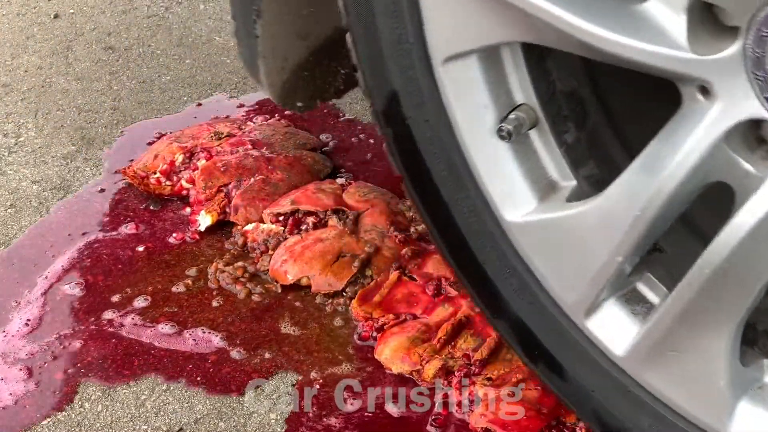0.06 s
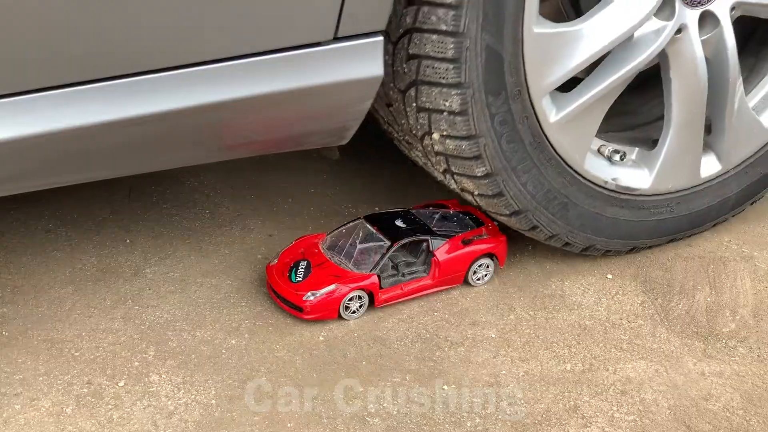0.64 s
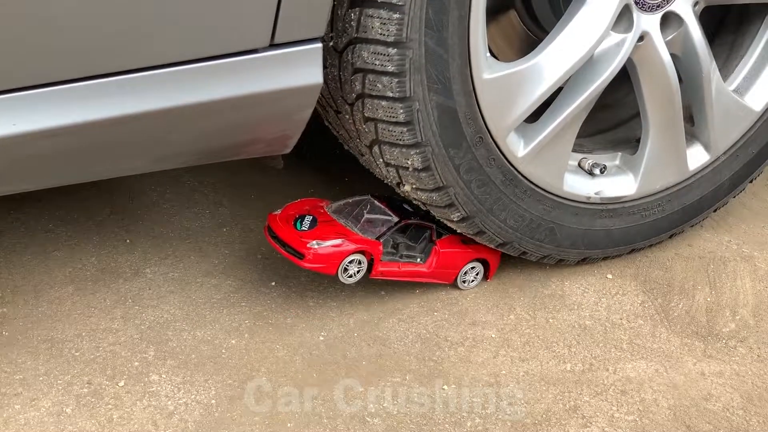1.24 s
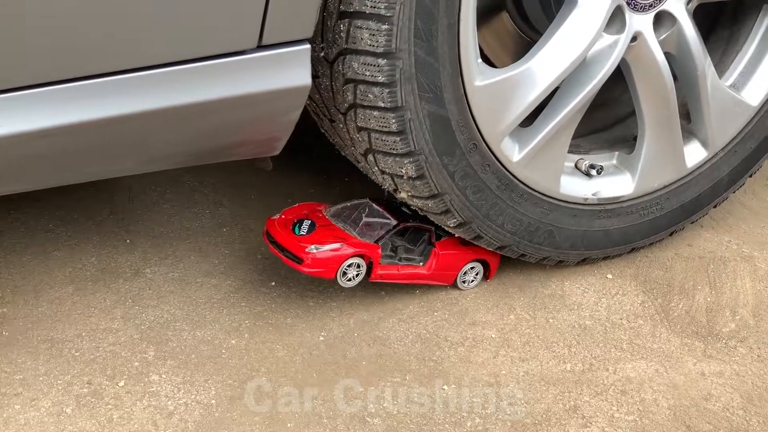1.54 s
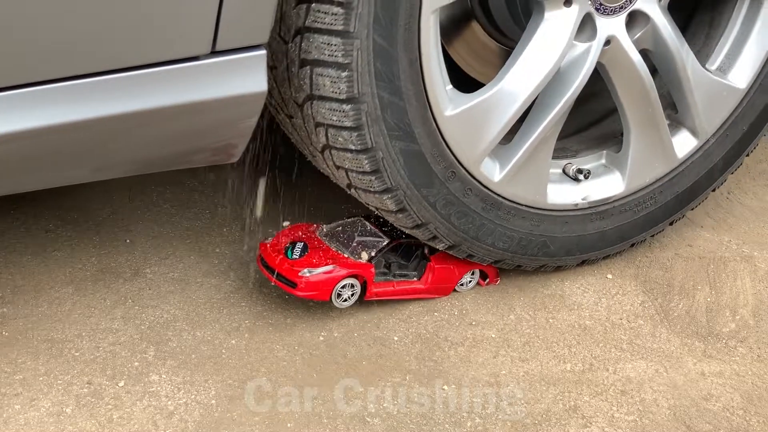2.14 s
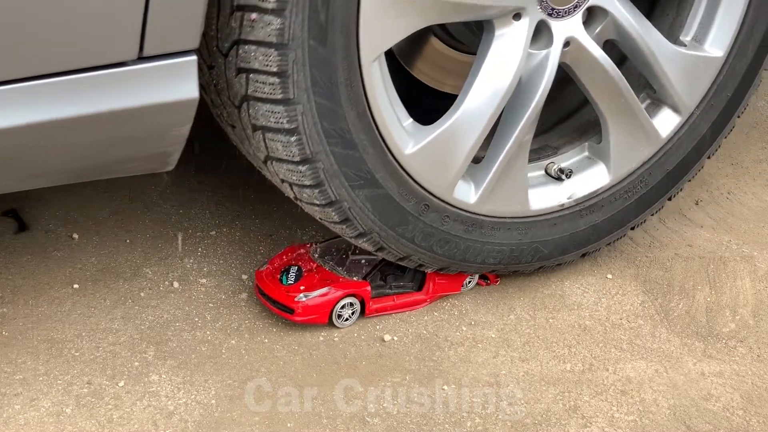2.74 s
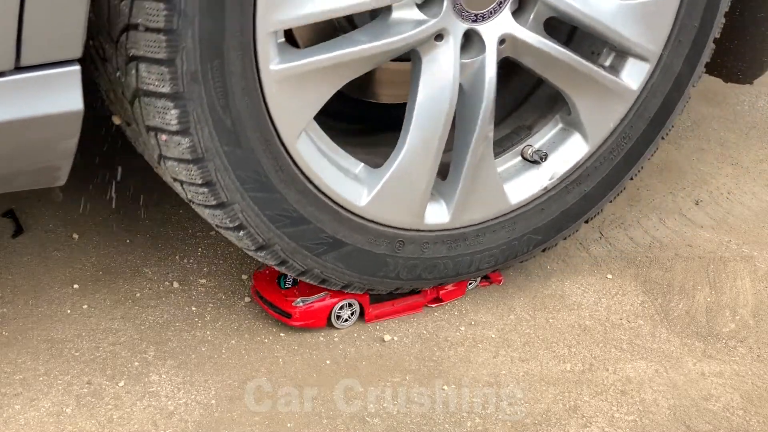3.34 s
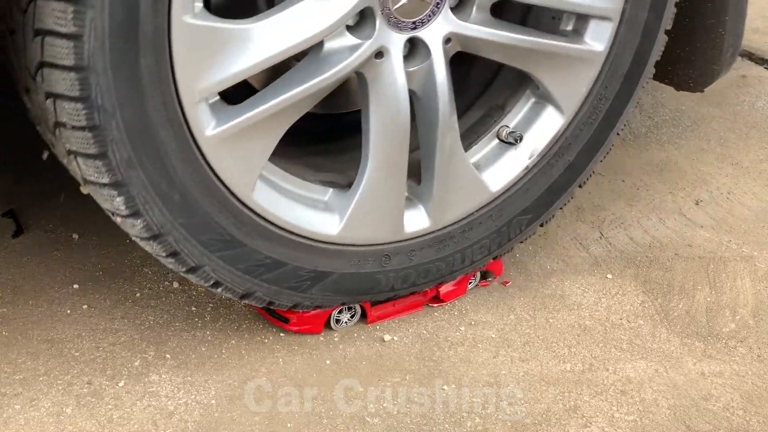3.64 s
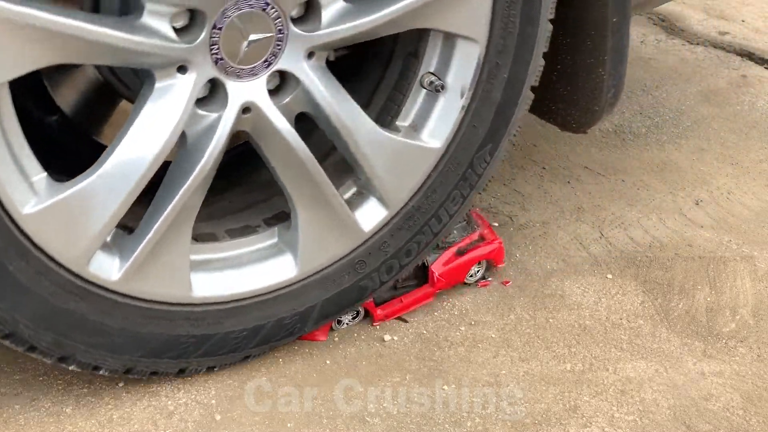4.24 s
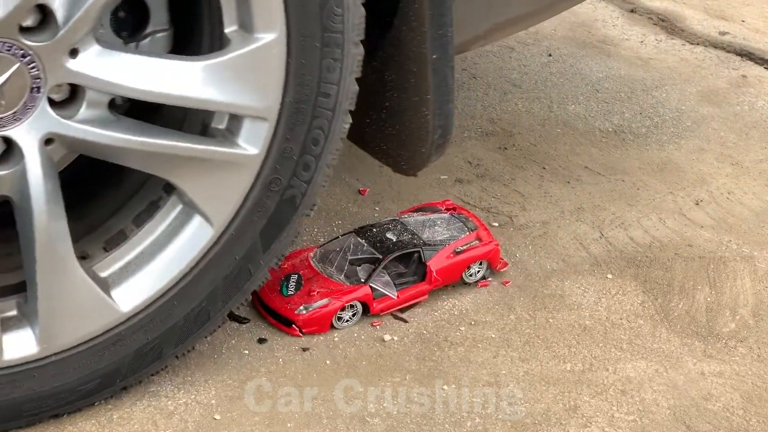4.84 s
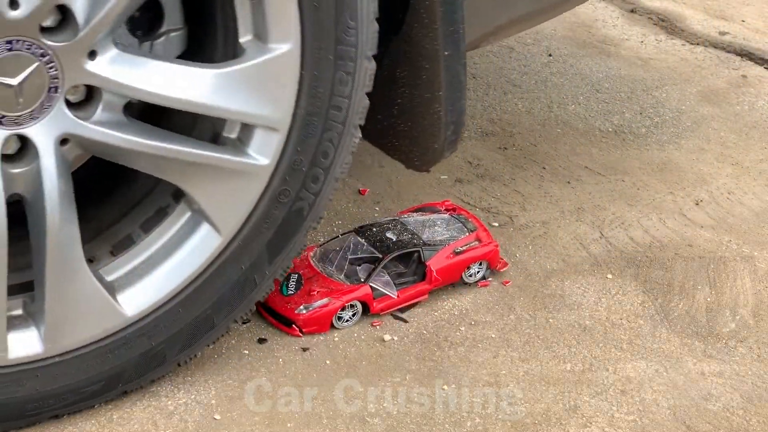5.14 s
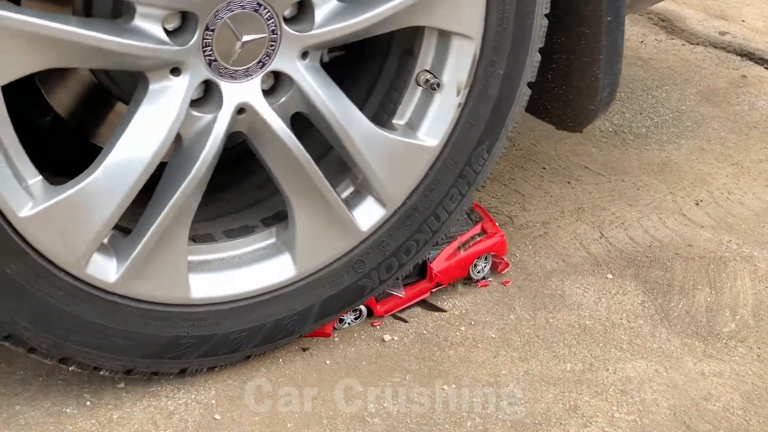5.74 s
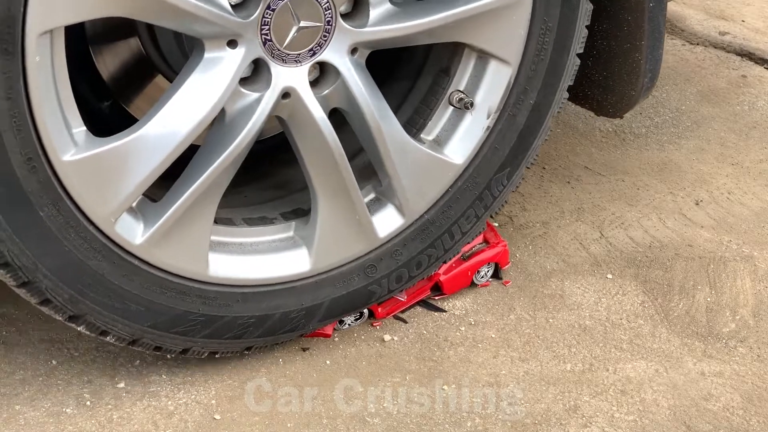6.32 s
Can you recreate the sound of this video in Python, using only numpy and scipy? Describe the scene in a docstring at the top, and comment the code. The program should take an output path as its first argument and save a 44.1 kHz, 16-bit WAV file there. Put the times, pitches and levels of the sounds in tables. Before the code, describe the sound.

Sharp, brittle cracks sound close up as a car wheel slowly flattens a plastic toy on concrete. A small scrape and a first snap lead into dense splintering, with fine ticks of grit and low bumps from the tyre. The cracking stops for about a second, then returns in a shorter, sparser run. Farther off, a low engine hum continues throughout, raspy at the start and dipping after loud cracks.

```python
"""A four-cylinder engine ticks over a little way off, with a bright rasp at first, as a car rolls off
squashed fruit. Right by the microphone its tyre creeps over grit onto a plastic toy car on concrete.
The toy scrapes, then its shell breaks in runs of dry snaps, with lesser splits and a scatter of chips;
where it caves in, the tyre drops with a thump. The wheel rolls off, then comes back over the wreck."""
import sys
import numpy as np
from scipy import signal
from scipy.fft import rfft, irfft, next_fast_len
from scipy.io import wavfile
from scipy.ndimage import uniform_filter1d, map_coordinates

SR = 44100
rng = np.random.default_rng(int(sys.argv[2]) if len(sys.argv) > 2 else 0)


def wav_out(sig):
    """Save sig, one row per channel (or a flat mono array), as 16-bit PCM at SR to the path in sys.argv[1]."""
    wavfile.write(sys.argv[1], SR, np.round(np.clip(np.atleast_2d(sig).T, -1, 1) * 32767).astype(np.int16))


N = 285768
EVENT_SIZE = 4096  # samples in one crack or thump
EVENT_T, EVENT_HZ = np.arange(EVENT_SIZE) / SR, np.fft.rfftfreq(EVENT_SIZE, 1 / SR)

# main fractures of the shell: t/s, snap/dB, ring of the piece/Hz, splinter/dB, knock/dB, nominal tear/s
FRACTURES = [(1.0233, -24, 3740, -39, -54, 0.0045), (1.028, -19, 3540, -17.5, -39, 0.0076),
             (1.49, -26, 6140, -17, -34.5, 0.0014), (1.603, -56, 6000.0, -23, -41, 0.0029),
             (1.6456, -30, 6000.0, -16, -36, 0.0048), (1.6535, -25.5, 2820, -19.5, -47, 0.00092),
             (1.7626, -36, 6200.0, -19, -31.5, 0.00094), (1.774, -26, 2830, -18.5, -47, 0.0015),
             (1.7901, -17.5, 5700.0, -14.5, -34, 0.0028), (1.806, -24, 6670, -14.5, -24, 0.0046),
             (1.837, -29.5, 6800.0, -21, -40, 0.0033), (1.8545, -34, 5660, -21, -45, 0.0018),
             (1.8612, -28, 5660, -16, -35, 0.0042), (1.8645, -18.5, 5780, -17, -22, 0.0033),
             (1.8807, -26, 2130, -24, -43, 0.0015), (1.8835, -21.5, 2140, -22, -34, 0.0012),
             (1.8952, -24, 2130, -24, -41, 0.0035), (1.903, -17.5, 2020, -17.5, -26.5, 0.0013),
             (1.9858, -40.5, 6200.0, -26, -39.0, 0.0023), (2.0365, -46, 3700.0, -32, -60, 0.0027),
             (2.0835, -41.5, 5450, -33, -62, 0.0018), (2.1265, -27, 6000, -16, -51, 0.0047),
             (2.192, -29, 6120, -23.5, -44, 0.0061), (2.253, -32, 5700.0, -24.5, -36, 0.0014),
             (2.279, -17.5, 3650, -19, -23.5, 0.003), (2.2834, -26, 1400, -23, -29, 0.0022),
             (2.321, -35.5, 1000.0, -30, -31, 0.0025), (2.386, -16, 1810, -16, -27.5, 0.00069),
             (2.4135, -18, 2010, -18.5, -26, 0.0032), (2.4346, -19.5, 3820, -25.5, -31.5, 0.0016),
             (2.504, -40, 5760, -29.5, -52, 0.0044), (2.5502, -33.5, 5400, -26.5, -45, 0.0034),
             (2.5765, -20.5, 2600, -16.5, -50, 0.0026), (2.581, -32, 5600, -22, -44, 0.0019),
             (2.593, -24, 4660, -25, -33, 0.0032), (2.661, -18, 1220, -17.5, -22.5, 0.0079),
             (2.679, -30.5, 2400, -29.5, -33.5, 0.003), (2.739, -40, 6300.0, -26, -53, 0.0013),
             (2.772, -37, 2470, -25.5, -50, 0.0038), (2.7963, -19.5, 2000, -19.5, -31.5, 0.0033),
             (2.8005, -23, 1900, -21, -34, 0.0063), (2.807, -30.5, 1900, -29.5, -38.5, 0.0035),
             (2.881, -31.5, 6840, -27, -35.5, 0.0024), (2.9305, -15, 1310, -16.5, -20.5, 0.0062),
             (2.94, -20, 2190, -22, -25.5, 0.0049), (2.9619, -29, 3950, -25, -36, 0.005),
             (3.016, -30.5, 1290, -29, -40, 0.0012), (3.0683, -22.5, 4460, -20.5, -23, 0.0016),
             (3.0934, -27.5, 2810, -18.5, -37, 0.0063), (3.1027, -22, 2920, -18, -29.5, 0.00053),
             (3.1307, -18, 1400.0, -15.5, -21.5, 0.0057), (3.203, -36, 3820, -31, -52, 0.0037),
             (3.2407, -42, 4700.0, -32.5, -51, 0.00077), (3.2969, -30, 3870, -27.5, -40.5, 0.011),
             (3.338, -27.5, 1310, -27, -31, 0.0012), (3.372, -16.5, 1720, -18.5, -22.5, 0.0021),
             (3.382, -26.5, 2490, -25.5, -35.5, 0.0049), (3.433, -37, 6800.0, -28.5, -39, 0.0062),
             (3.4612, -25, 6500.0, -24, -26.5, 0.0023), (3.529, -23, 3480, -18, -34, 0.0045),
             (3.599, -34, 2100.0, -26.5, -35.5, 0.002), (3.6024, -26.5, 2100, -23, -32, 0.0022),
             (3.609, -23, 2150, -23.5, -29, 0.0024), (3.6648, -22.5, 3470, -18.5, -31, 0.0013),
             (3.7129, -23, 2570, -19, -21.5, 0.0046), (3.7375, -27.5, 6500.0, -25.5, -34.5, 0.0061),
             (3.7607, -36, 3800.0, -25.5, -46, 0.0012), (3.7907, -29.5, 2800, -37, -34, 0.0017),
             (3.8085, -22, 2530, -25, -37, 0.0013), (3.932, -31, 3500.0, -27, -35.5, 0.003),
             (3.954, -23.5, 3900.0, -17.5, -25, 0.0013), (3.9867, -29.5, 4200, -29, -49, 0.0036),
             (3.9919, -22, 2630, -22.5, -34.5, 0.0018), (4.042, -34, 2130, -42.5, -58, 0.00054),
             (4.0991, -25.5, 2490, -22.5, -23, 0.0021), (4.1337, -33.5, 2800.0, -30.5, -35, 0.0015),
             (4.162, -32.5, 1000.0, -33, -23.5, 0.0023), (4.1751, -25, 2930, -28.5, -21.5, 0.0037),
             (4.367, -21, 3180, -26.5, -26.5, 0.0014), (4.4487, -35.5, 2280, -45.5, -45, 0.015),
             (4.4804, -36, 3680, -39, -65, 0.0096), (5.4491, -31, 2920, -26, -44, 0.0045),
             (5.5048, -34.5, 6330, -24.5, -43, 0.0047), (5.589, -38, 1520, -22.5, -49, 0.00035),
             (5.5964, -34, 4000, -30, -33, 0.0027), (5.6004, -26, 1500, -34, -23, 0.0016),
             (5.6115, -37, 3950, -22, -33, 0.0019), (5.6842, -24, 3300.0, -23.5, -30, 0.0025),
             (5.6912, -25, 1650, -27, -38, 0.0022), (5.7003, -27.5, 4000.0, -23, -45, 0.0023),
             (5.7458, -19, 2700, -24.5, -25, 0.0014), (5.884, -41.5, 1490, -59, -47, 0.0059),
             (5.9487, -31, 1670, -38, -42, 0.0025), (5.956, -20.5, 1660, -30.5, -40, 0.0039),
             (6.059, -33, 1730, -33, -59, 0.0079), (6.121, -36, 1730, -31.5, -32, 0.0033),
             (6.2052, -39.5, 1520, -44, -33.5, 0.00036), (6.307, -35, 4260, -28, -45, 0.0044),
             (6.3608, -20, 2770, -17, -27.5, 0.0019)]
# spectrum of a dry snap: f/Hz, level/dB
SNAP_SPECTRUM = [(300, -17), (900, -11), (1300, -4.5), (2000, -4), (3800, -5), (5000, -9), (7000, -11.5),
                 (12000, -44.5)]
# spectrum of bright splintering: f/Hz, level/dB
SPLINTER_SPECTRUM = [(1500, -22.5), (4000, -5.5), (5600, -1.5), (7200, -2), (8700, 0.5), (11000, -2),
                     (13200, -2), (15600, -5), (16500, -37.5)]


def amp(db):
    return 10 ** (np.asarray(db) / 20)


def unit(x):
    return x / np.sqrt(np.mean(x ** 2) + 1e-20)


def along(points, hz):
    """(Hz, value) points on a log axis."""
    f, v = np.transpose(points)
    return np.interp(np.log(hz + 1), np.log(f + 1), v)


def curves(rows):
    """One value per sample for each column after the time."""
    s, *cols = np.transpose(rows)
    return [np.interp(np.arange(N) / SR, s, c) for c in cols]


def wobble(rate):
    """A smooth random curve, rate knots a second."""
    return map_coordinates(rng.standard_normal(int(N * rate / SR) + 4), [np.arange(N) * rate / SR])


def filtered(x, response):
    """x times a complex response of frequency."""
    m = next_fast_len(N + SR // 2)
    return irfft(rfft(x, m) * response(np.fft.rfftfreq(m, 1 / SR)), m)[..., :N]


def coloured(x, spectrum):
    """x shaped by a spectrum, at rms 1."""
    return unit(filtered(x, lambda hz: amp(along(spectrum, hz))))


def causal(gain_db):
    """The response with this gain that rings only after its cause."""
    cepstrum = irfft(np.log(amp(gain_db)))
    half = cepstrum.shape[-1] // 2
    cepstrum[..., 1:half] *= 2
    cepstrum[..., half + 1:] = 0
    return np.exp(rfft(cepstrum))


def ports(pair, likeness):
    """Two unrelated signals become left and right with a given likeness."""
    turn = lambda hz: np.arccos(np.clip(along(likeness, hz), -1, 1)) / 2
    mid, side = filtered(pair, lambda hz: np.array([np.cos(turn(hz)), np.sin(turn(hz))]))
    return np.array([mid + side, mid - side])


def ringing(x, modes):
    """x through resonances: f/Hz, width/Hz, level/dB."""
    return filtered(x, lambda f: sum(amp(db) * 1j * f * width / (centre**2 - f**2 + 1j * f * width)
                                     for centre, width, db in modes))


def placed(sounds, times, level_db):
    """Lay one sound per event on a stereo track, at its level over the first 10 ms."""
    sounds = sounds / np.sqrt(np.mean(sounds[..., :SR // 100] ** 2, axis=-1, keepdims=True))
    track = np.zeros((2, N + EVENT_SIZE))
    for s, db, sound in zip(times, level_db, sounds):
        track[:, round(s * SR):][:, :EVENT_SIZE] += amp(db) * sound
    return track[:, :N]


def tears(gain_db, length, jagged_db, echo_db, echo_t60, tail_db, tail_t60, rise=.0003, ragged_db=3):
    """Plastic tears in jerks, then splinters on and echoes under the wheel; times in s."""
    def jerks(db, hold):
        steps = rng.standard_normal((len(length), 1, EVENT_SIZE // hold))
        return np.repeat(amp(db * steps), hold, axis=-1)

    t = EVENT_T
    tear = jerks(jagged_db, hold=16) * np.exp(-(t / length[:, None, None]) ** 2)
    decay = amp(echo_db - 60 * t / echo_t60) + amp(tail_db - 60 * t / tail_t60)
    echoes = jerks(ragged_db, hold=64) * decay
    onset = 1 - np.exp(-(t / rise) ** 2)
    force = onset * (tear + echoes) * rng.standard_normal((len(length), 2, EVENT_SIZE))
    return irfft(rfft(force) * causal(gain_db)[..., None, :])


def engine(waver_db=2.5, throb=.17, rumble_db=-4.5, hiss_db=-11.5, tick_depth=1.35, tick_turns=.22):
    """Idle, a little way off: exhaust note, droning panels, rumble, and hiss that ticks once a turn."""
    # the engine at the microphone, ducked by the phone's gain control after loud cracks: t/s, level/dB
    heard_engine_level = [(0, -36), (.4, -34.5), (.53, -35), (.58, -31), (1.02, -30.5), (1.05, -42.5),
                          (1.17, -40), (1.23, -30.5), (1.6, -33), (1.78, -35), (2.0, -50.5), (2.24, -35.5),
                          (2.35, -44.5), (2.75, -43), (3.2, -44.5), (5.0, -46.5), (5.04, -41), (5.55, -38),
                          (6.48, -38)]
    crank_speed = [(0, 27.7), (.8, 27.5), (1.6, 27.3), (3, 27.4), (4.7, 27.6), (6.48, 27.7)]  # t/s, speed/(turns per s)
    exhaust_orders = [(1, -29), (2, 5.5), (3, -3), (4, -7), (5, -8.5), (6, -20.5), (7, -18), (8, -14.5),
                      (9, -23), (10, -22), (11, -21.5), (12, -14)]  # multiple of the crank speed, relative level/dB
    panel_levels = [(0, -70, -47.5, -70), (.5, -70, -43, -70), (.6, -62, -61.5, -67), (.8, -56, -61, -50.5),
                    (1.3, -55, -61, -52), (1.9, -61, -60.5, -62), (4.2, -60.5, -60.5, -69),
                    (5.1, -51.5, -61, -63.5), (6.48, -50, -68, -59)]  # body panels: t/s, 5th order/dB, 6th order/dB, 12th order/dB
    rumble_spectrum = [(20, -17), (50, 1.5), (100, 1), (200, -2.5), (270, -1.5), (340, -2.5), (400, -2),
                       (470, 1), (600, -4.5), (800, -4), (1150, -12.5), (2500, -27), (8000, -67.5)]  # f/Hz, level/dB
    hiss_spectrum = [(400, 9.5), (1200, -0.5), (1600, 6.5), (2100, 5), (2900, 2), (3600, -2), (5800, -5.5),
                     (7300, -11.5), (9000, -9.5), (11000, -13), (13500, -14.5), (15700, -23), (16300, -45)]  # f/Hz, level/dB
    rasp_level = [(0, -45), (.54, -46), (.6, -73), (.7, -100)]  # bright edge on the ticking, beside the fruit: t/s, level/dB
    rasp_spectrum = [(700, -6), (1700, -2), (2500, 1.5), (2780, 4), (3050, -1.5), (3500, -6), (4800, -7.5),
                     (6700, -10), (8600, -12), (10000, -19), (13500, -23), (16000, -33.5)]  # f/Hz, level/dB
    far_likeness = [(60, 0.61), (250, 0.49), (600, -0.29), (1300, -0.77), (2500, 0.81), (3600, -0.4),
                    (4600, 0.14), (6000, -0.11), (8600, 0.8), (11500, 1)]  # diffuse sound at the two microphone ports: f/Hz, correlation
    heard_db, = curves(heard_engine_level)
    turns = np.cumsum(curves(crank_speed)[0] * (1 + .004 * wobble(9))) / SR
    angle = 2 * np.pi * turns
    note = np.zeros(N)
    for order, db in exhaust_orders:
        unrest = np.log(order / 2)  # zero at the firing rate, twice a turn
        strength = amp(db + waver_db * unrest * wobble(7.6))
        note += strength * np.cos(order * angle + .62 * unrest * wobble(11))
    drone = sum(amp(db) * np.sqrt(2) * np.sin(order * angle)
                for order, db in zip((5, 6, 12), curves(panel_levels)))
    hum = amp(heard_db) * unit(note) + drone
    noise = lambda spectrum: coloured(rng.standard_normal((2, N)), spectrum)
    rumble = amp(heard_db + rumble_db + 1.8 * wobble(12)) * noise(rumble_spectrum)
    rumble *= 1 + throb * np.cos(angle)
    hiss = amp(heard_db + hiss_db) * noise(hiss_spectrum)
    rasp = amp(curves(rasp_level)[0]) * noise(rasp_spectrum)
    ticking = unit(1 + tick_depth * np.exp(-(turns % 1) / tick_turns))
    return hum * amp([[-1.2], [1.1]]) + ports(rumble + (hiss + rasp) * ticking, far_likeness)


def grit_and_chips(ticks_per_s=1000, tick_t60=.004, chip_db=-20.5, chip_t60=.16):
    """Tiny uneven ticks: dull grit under the tread, and bright chips scattering after each fracture."""
    grit_level = [(0, -52.5), (.95, -56.5), (1.1, -48.5), (1.5, -45.5), (2.05, -54.5), (3.7, -49),
                  (4.25, -55), (4.46, -42.5), (4.53, -77), (5.35, -71.5), (5.6, -39.5), (5.9, -61.5),
                  (6.48, -48)]  # t/s, level/dB
    ticks = (rng.random(N) < ticks_per_s / SR) * amp(3.7 * np.minimum(rng.exponential(size=N), 3))
    t = np.arange(SR // 20) / SR
    grains = signal.fftconvolve(ticks, amp(-60 * t / tick_t60))[:N] * rng.standard_normal((2, N))
    dull, bright = coloured(grains, SNAP_SPECTRUM), coloured(grains, SPLINTER_SPECTRUM)
    grit = amp(curves(grit_level)[0]) * unit(dull + amp(-6) * bright)
    s, snap_db = np.transpose(FRACTURES)[:2]
    shed = np.bincount(np.round(s * SR).astype(int), amp(snap_db + chip_db) ** 2, N)
    chip_power = signal.lfilter([1], [1, -amp(-60 / (chip_t60 * SR)) ** 2], shed)
    return grit + np.sqrt(chip_power) * unit(dull + amp(2) * bright)


def scrape(rough_db=3):
    """As the tyre first bears on it, the toy slips unevenly on the concrete and its shell rings."""
    scrape_level = [(.84, -92.5), (.9, -48), (.94, -48), (.97, -61), (1.02, -38), (1.05, -87)]  # t/s, level/dB
    shell_modes = [(4200, 220, 0), (6210, 250, -5.5)]  # f/Hz, width/Hz, level/dB
    slips = amp(rough_db * wobble(150)) * rng.standard_normal((2, N))
    return amp(curves(scrape_level)[0]) * unit(ringing(slips, shell_modes))


def hairline_cracks(snap_db=-8, tear_s=.0009):
    """The strained shell clicks between fractures: short, bright and dry."""
    clicks = [(1.0006, -39), (1.078, -49), (1.1045, -41), (1.118, -40.5), (1.167, -39), (1.2, -45),
              (1.371, -41.5), (1.405, -39.5), (1.468, -35), (1.729, -37.5), (1.822, -28), (1.978, -41),
              (2.247, -29.5), (2.312, -42), (2.356, -34), (2.459, -49), (2.189, -32), (2.641, -40),
              (2.723, -33.5), (2.918, -32.5), (2.975, -33), (3.000, -29.5), (3.039, -36.5), (3.060, -39),
              (3.126, -30), (3.222, -41), (3.332, -31), (3.365, -30), (3.394, -33), (3.455, -42),
              (3.506, -35.5), (3.562, -44), (3.578, -35.5), (3.644, -31), (3.676, -30.5), (3.726, -31.5),
              (3.836, -38), (3.870, -39), (3.895, -35), (3.900, -34.5), (3.946, -33.5), (4.033, -35.5),
              (4.083, -44), (4.148, -38), (4.262, -45), (4.414, -51), (5.438, -37.5), (5.576, -36.5),
              (5.654, -39.5), (6.042, -37.5), (6.436, -40)]  # t/s, splinter level/dB
    s, db = np.transpose(clicks)
    length = np.full(len(s), tear_s)
    texture = dict(jagged_db=4, echo_db=-17, echo_t60=.04, tail_db=-26, tail_t60=.09)
    splinter = tears(along(SPLINTER_SPECTRUM, EVENT_HZ), length, **texture)
    snap = tears(along(SNAP_SPECTRUM, EVENT_HZ), length, **texture)
    return placed(splinter, s, db) + placed(snap, s, db + snap_db)


def buckles(width_octaves=.17):
    """A flattened panel of the toy gives way softly and knocks in one hollow resonance."""
    knocks = [(2.799, -28, 1950, .004), (3.954, -29.5, 1320, 0.0036), (4.16, -30, 1210, .003),
              (5.451, -31.5, 1070, 0.0041), (5.452, -30, 1620, 0.0043), (5.597, -24, 1547, .005),
              (5.956, -30.5, 1160, 0.0045), (6.118, -29, 1143, 0.0054)]  # t/s, level/dB, ring/Hz, tear/s
    s, db, ring_hz, length = np.transpose(knocks)
    ring_db = -14 * np.log10(1 + (np.log2((EVENT_HZ + 1) / ring_hz[:, None]) / width_octaves) ** 2)
    hollow = tears(ring_db, length, rise=.001, jagged_db=3, ragged_db=2,
                   echo_db=-13, echo_t60=.04, tail_db=-22, tail_t60=.1)
    return placed(hollow, s, db)


def tyre_thumps(nudge_db=-16.5, push_s=.00052):
    """Each main fracture nudges the tyre, each cave-in drops it; its sidewall and the air inside ring."""
    drops = [(1.868, -33), (1.905, -25.5), (2.2815, -26.5), (2.4155, -36), (2.6635, -23.5), (3.134, -19),
             (3.3745, -26.5), (3.956, -27), (3.995, -35), (4.177, -31.5), (4.369, -34.5), (5.748, -29)]  # t/s, level/dB
    thump_spectrum = [(30, -38.5), (90, -8.5), (150, -9.5), (300, 1), (420, 1.5), (800, -14), (2000, -47)]  # f/Hz, level/dB
    tyre_modes = [(138, 26, 2), (226, 26, -2), (217, 5, 1)]  # f/Hz, width/Hz, level/dB
    nudges = [(s, knock_db + nudge_db) for s, *_, knock_db, _ in FRACTURES]
    s, db = np.vstack([drops, nudges]).T
    age = EVENT_T / (push_s * np.exp(.046 * rng.standard_normal((len(s), 1, 1))))
    push = age ** 2 * (3 - age) * np.exp(-age)
    thumps = placed(irfft(rfft(push) * causal(along(thump_spectrum, EVENT_HZ))), s, db)
    return thumps + ringing(thumps, tyre_modes)


def lesser_splits(chance=.35, lead_s=.0062, follow_s=.014, split_db=-12.5, scatter_db=5, tear_s=.00049):
    """A small bright split may come just before or after a fracture; rows as in FRACTURES."""
    parents = np.vstack([FRACTURES, FRACTURES])
    draw, wait, size, pitch = rng.random((len(parents), 4)).T
    s = parents[:, 0] + np.repeat([-lead_s, follow_s], len(FRACTURES)) * (.5 + wait)
    snap_db = parents[:, 1] + split_db + scatter_db * (2 * size - 1)
    ring_hz = 5300 * 2 ** (2 * pitch - 1)
    splinter_db, knock_db = snap_db - 2, snap_db - 18.5
    rows = np.transpose([s, snap_db, ring_hz, splinter_db, knock_db, np.full(len(s), tear_s)])
    return rows[draw < chance]


def breaking_shell(knock_lag_s=.001):
    """The plastic snaps, splinters and knocks the ground; each piece has a main ring and weaker modes."""
    knock_spectrum = [(150, -30), (300, -9.5), (440, -3), (570, -1.5), (700, 3.5), (800, -1.5), (950, -7.5),
                      (1250, -16.5), (2500, -27.5)]  # f/Hz, level/dB
    s, snap_db, ring_hz, splinter_db, knock_db, length = np.vstack([FRACTURES, lesser_splits()]).T
    ring_db = 6 / (1 + (np.log2((EVENT_HZ + 1) / ring_hz[:, None]) / .24) ** 2)
    scatter = rng.standard_normal((len(s), len(EVENT_HZ)))
    modes_db = 3.3 * unit(uniform_filter1d(uniform_filter1d(scatter, size=18), size=12))
    snap_colour = along(SNAP_SPECTRUM, EVENT_HZ) + ring_db + modes_db
    splinter_colour = along(SPLINTER_SPECTRUM, EVENT_HZ) + modes_db
    brittle = dict(jagged_db=5.5, echo_db=-10.5, echo_t60=.042)
    snap = tears(snap_colour, .95 * length, tail_db=-16, tail_t60=.105, **brittle)
    splinter = tears(splinter_colour, .7 * length, tail_db=-21, tail_t60=.09, **brittle)
    knock = tears(along(knock_spectrum, EVENT_HZ), 1.3 * length, tail_db=-17, tail_t60=.11, **brittle)
    cracks = placed(snap, s, snap_db) + placed(splinter, s, splinter_db)
    return cracks + placed(knock, s + knock_lag_s, knock_db)


def scene():
    """Everything under the tread is close to the microphone; the engine is farther off."""
    near_likeness = [(100, 0.98), (700, 0.96), (1500, 0.96), (3000, 0.62), (5000, 0.01), (6500, 0.29),
                     (8500, 0.37), (12000, 1), (16000, .9)]  # close sound at the two microphone ports: f/Hz, correlation
    far = engine()
    near = grit_and_chips() + scrape() + tyre_thumps() + breaking_shell() + hairline_cracks() + buckles()
    return ports(near, near_likeness) * amp([[-.4], [.5]]) + far


def record(dry):
    """A phone's stereo microphone: treble reaches the left late, peaks round off, the band is limited."""
    lag_s, lag_above_hz, ceiling, top_hz = .000298, 6710, .9, 16500
    phase = lambda hz: np.pi * lag_s * np.maximum(hz - lag_above_hz, 0)
    wide = filtered(dry, lambda hz: np.exp(1j * phase(hz) * np.array([[-1], [1]])))
    rounded = wide / (1 + (wide / ceiling) ** 4) ** (1 / 4)
    return filtered(rounded, lambda hz: hz < top_hz)


dry = scene()
out = record(dry)
wav_out(out)
```